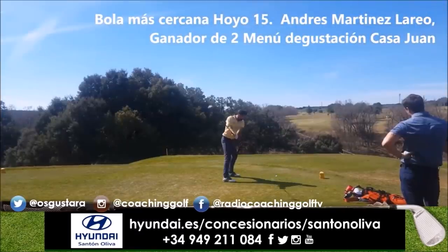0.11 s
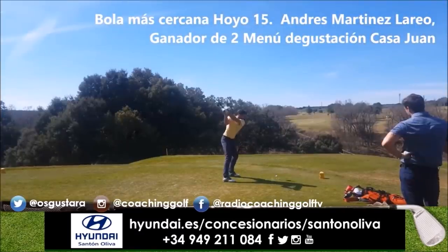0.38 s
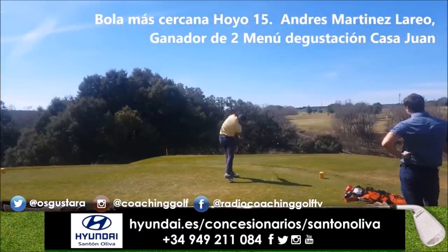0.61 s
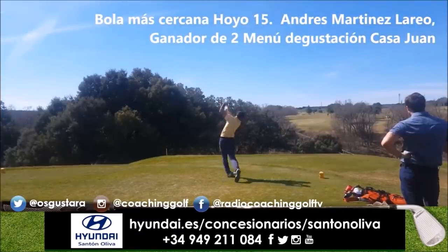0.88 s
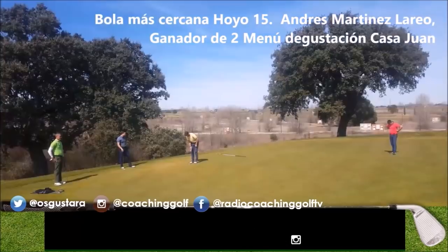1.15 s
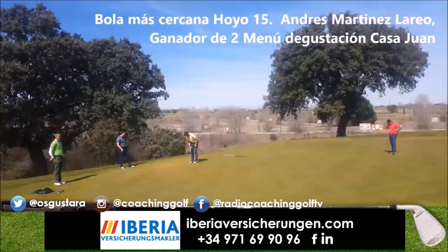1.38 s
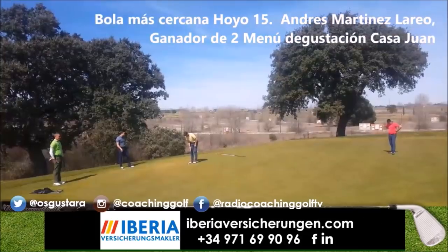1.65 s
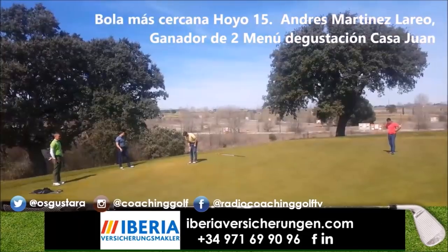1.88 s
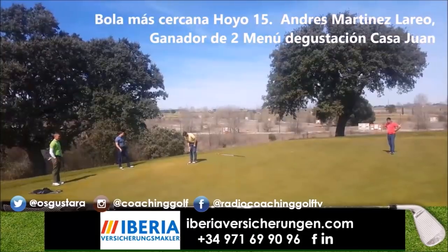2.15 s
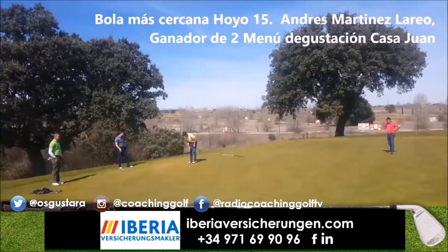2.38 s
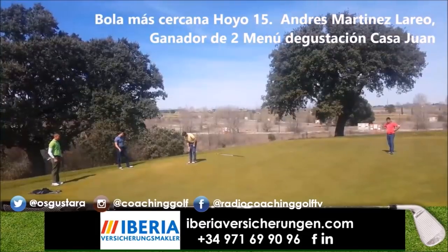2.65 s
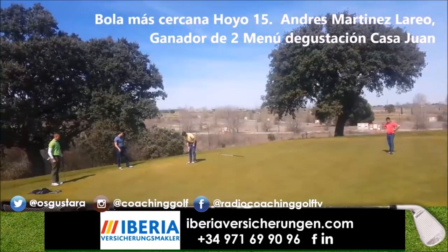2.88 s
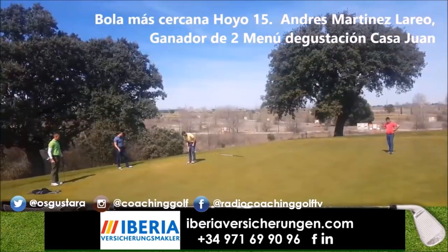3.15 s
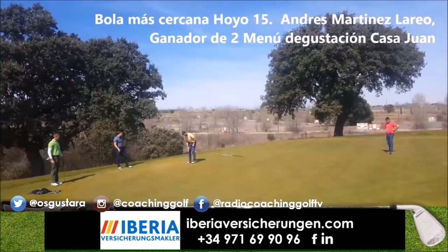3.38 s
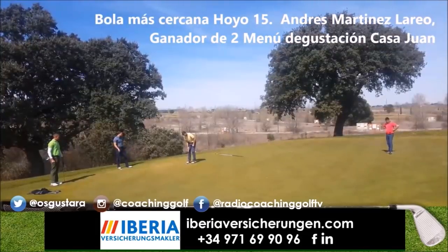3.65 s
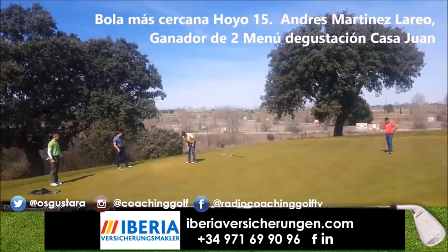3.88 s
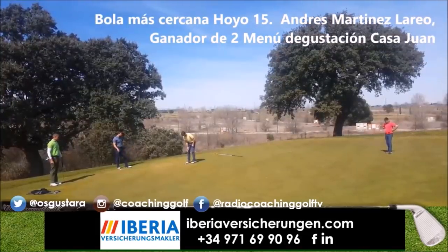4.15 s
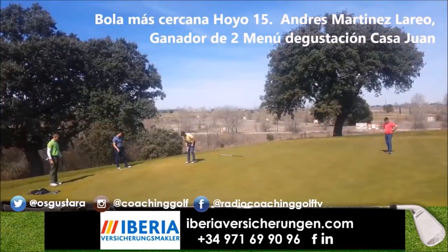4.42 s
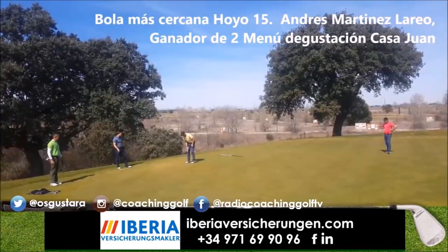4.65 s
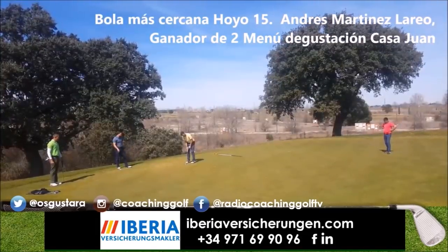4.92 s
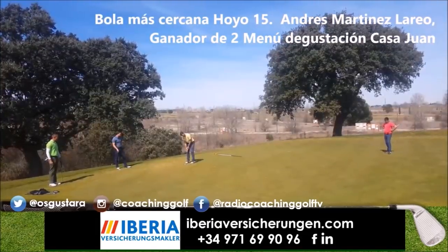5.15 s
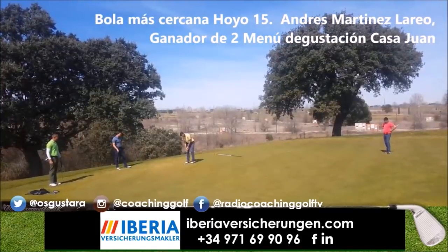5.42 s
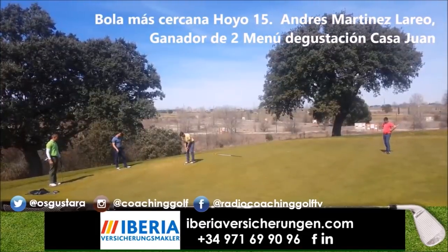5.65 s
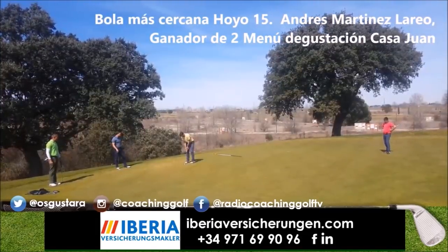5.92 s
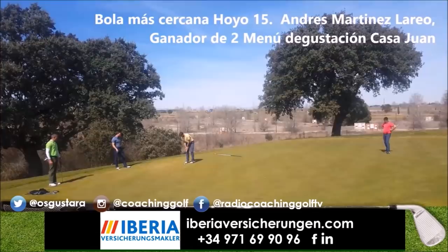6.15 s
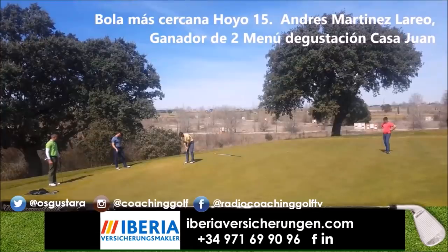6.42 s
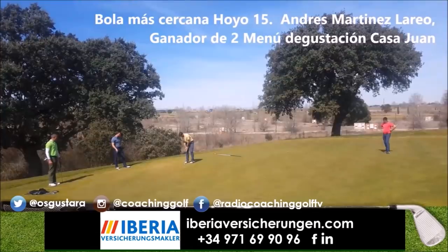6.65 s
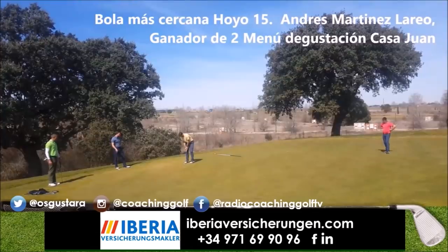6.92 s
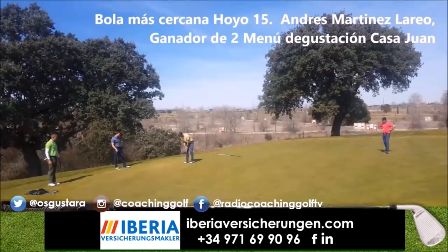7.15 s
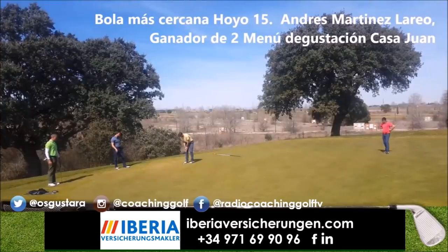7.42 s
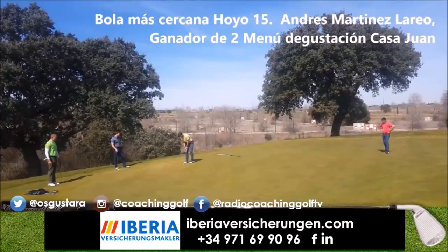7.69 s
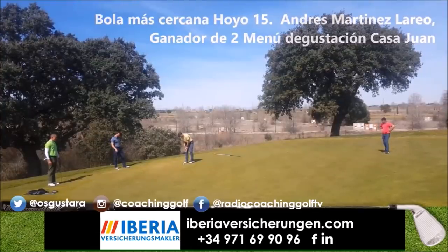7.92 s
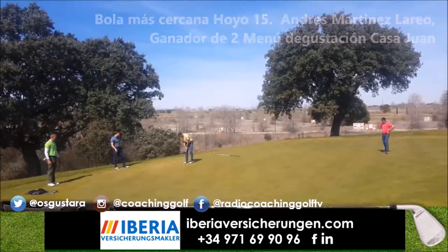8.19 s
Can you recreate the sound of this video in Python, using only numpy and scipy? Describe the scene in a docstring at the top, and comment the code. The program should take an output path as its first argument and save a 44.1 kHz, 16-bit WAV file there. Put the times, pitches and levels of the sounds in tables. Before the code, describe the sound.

Short rising whoosh, a sharp metallic golf strike with scattered outdoor echo, then faint finch and thrush song over soft wind, hiss and distant motor.

```python
"""An iron cracks a ball off a tee: an elastic push and rebound, with a sum of decaying modes for the head.
Before it come a dry tick and the swish of the shaft; after it, turf and trees scatter the crack as noise.
Then a quiet green: a finch, a thrush and two smaller birds, built of gliding sines and noise puffs,
over light wind, hiss and a distant motor, all shaped noise, heard by two spaced microphones."""
import sys
import numpy as np
from scipy import signal
from scipy.io import wavfile
from scipy.ndimage import uniform_filter1d, map_coordinates

SR = 44100
rng = np.random.default_rng(int(sys.argv[2]) if len(sys.argv) > 2 else 0)


def ratio_of_db(decibels):
    """Turn decibels (scalar or array-like) into linear amplitude factors; 0 dB maps to 1."""
    return 10 ** (np.asarray(decibels, float) / 20)


def master_out(mix):
    """Clip the mix to full scale and print it as 16-bit PCM to the path in sys.argv[1]."""
    frames = np.transpose(np.atleast_2d(mix))
    ceiling = np.clip(frames, -1, 1)
    pcm = np.round(ceiling * 32767).astype(np.int16)
    wavfile.write(sys.argv[1], SR, pcm)


N = 366030
T = np.arange(N) / SR
STRIKE_S, GREEN_S = .6674, 1.02  # impact; the scene moves from the tee to the green


def evened(x):
    """Normalisation to unit rms."""
    return x / np.sqrt(np.mean(x ** 2) + 1e-20)


def curve(rows, column=1, t=T):
    """Linear interpolation of a table column over its first column."""
    return np.interp(t, *np.transpose(rows)[[0, column]])


def read(points, hz):
    """Interpolation of a spectrum along a logarithmic frequency axis."""
    f, value = np.transpose(points)
    return np.interp(np.log(hz + 1), np.log(f + 1), value)


def add(mix, s, sound):
    """Superposition: the sound is summed into the mix from s seconds on."""
    part = mix[..., round(s * SR):][..., :sound.shape[-1]]
    part += sound[..., :part.shape[-1]]


def delayed(x, ms):
    """Propagation delay by a fractional, possibly varying, number of samples."""
    return map_coordinates(x, [np.arange(N) - ms * SR / 1000], order=3)


def resonate(x, hz, width):
    """Heterodyne resonance of gain 1: hz is shifted down to zero, smoothed and shifted back."""
    turn = np.exp(2j * np.pi * np.cumsum(hz * np.ones(x.shape[-1])) / SR)
    r = np.exp(-np.pi * width / SR)
    return 2 * (turn * signal.lfilter([1 - r], [1, -r], x / turn)).real


def noise(colour, same, count=N, size=1024, patchy_db=0):
    """Partly coherent stereo noise: spectral shaping, likeness `same` of hz, and drifting patches."""
    hz = np.fft.rfftfreq(size, 1 / SR)
    a, b, c, d, patches = rng.standard_normal((count * 4 // size + 5, len(hz), 5)).T
    patches = uniform_filter1d(patches, 10, 0)
    patches = evened(uniform_filter1d(patches, 10, 1))
    same = np.clip(same(hz) + 0 * hz, -1, 1)[:, None]
    left = a + 1j * b
    right = same * left + np.sqrt(1 - same ** 2) * (c + 1j * d)
    z = np.array([left, right])
    z *= ratio_of_db(read(colour, hz)[:, None] + patchy_db * patches)
    return evened(signal.istft(z, nperseg=size, noverlap=size * 3 // 4)[1][:, :count])


def puff(length, hz, width, db):
    """Band-limited noise burst: two resonances in series under a tapered envelope."""
    z = resonate(rng.standard_normal(SR // 3), hz, width)
    z = resonate(z, hz, width)[-round(length * SR):]
    return ratio_of_db(db) * evened(z) * signal.windows.tukey(len(z), .7)


def note(start, length, from_hz, to_hz, db, shape, rough, wobble=0, beak=None):
    """Frequency modulation: a near sine glides along its shape, soft-ended and wavering in level."""
    t = np.arange(-.004, length + 0.0063, 1 / SR)
    hz = from_hz + (to_hz - from_hz) * curve(shape, 1, t / length)
    db = db + (read(beak, hz) if beak else 0)
    drift = 1 + wobble * evened(uniform_filter1d(rng.standard_normal(SR // 3), 300))[:len(t)]
    turns = np.cumsum(uniform_filter1d(hz * drift, 100)) / SR
    waver = 1 + rough * evened(uniform_filter1d(rng.standard_normal(SR // 3), 350))[:len(t)]
    ends = np.clip(np.minimum(t - t[0], t[-1] - t) / 0.0084, 0, 1)
    level = np.sqrt(2) * ratio_of_db(db + curve(shape, 2, t / length))
    return start + t[0], level * ends * waver * np.sin(2 * np.pi * turns)


def outdoors(x, wet_db, t60):
    """Diffuse scattering: foliage smears each note into a short unlike tail per side."""
    t = np.arange(SR // 2) / SR
    tail = rng.standard_normal((2, len(t))) * ratio_of_db(-60 * t / t60) * (t > .01)
    return ratio_of_db(wet_db) * signal.fftconvolve(x[None], tail / np.linalg.norm(tail[0]), axes=1)[:, :N]


def on_the_right(x):
    """Time and level difference between the sides: the right is earlier and louder, plus foliage."""
    left = delayed(x, .185)
    return np.array([left * ratio_of_db(-3.5), x * ratio_of_db(3.5)]) + outdoors(x, wet_db=-15, t60=.6)


# spectrum of air and hiss: (frequency [Hz], relative density [dB])
AIR_COLOUR = [(120, -38.5), (260, -1.5), (400, -1), (800, -2), (1300, -7.5), (2800, -11), (5000, -13.5),
              (6500, -18), (10000, -21.5), (13000, -18.5), (15800, -18.5)]
# its level: (time [s], level [dB])
AIR_LEVEL = [(0, -72.5), (.6, -69), (1.01, -73.5), (1.03, -71), (3, -71.5), (8.3, -71.5)]
# left-right likeness: (frequency [Hz], coherence [-1 to 1])
AIR_LIKENESS = [(60, 0.61), (240, 0.1), (950, -0.06), (3770, -0.12), (15000, -0.01)]


def air():
    """Broadband noise of air and microphone hiss, with frequency-dependent coherence."""
    hiss = noise(AIR_COLOUR, lambda hz: read(AIR_LIKENESS, hz), size=2048, patchy_db=0.84)
    return hiss * ratio_of_db(curve(AIR_LEVEL))


# low rumble of wind and far traffic: (time [s], level [dB])
WIND_LEVEL = [(0, -69.5), (.6, -70), (.75, -75), (1.01, -79.5), (1.03, -69), (1.6, -68), (2.2, -64.5),
              (2.6, -67), (4, -68), (5.4, -67.5), (6.2, -68.5), (6.7, -65), (7.6, -66), (8.3, -66)]
# its spectrum: (frequency [Hz], relative density [dB])
WIND_COLOUR = [(15, -23.5), (40, -2.5), (95, -0.5), (160, -9), (250, -14), (500, -52), (1500, -110)]
# wind buffets on the microphones:
# (start [s], length [s], frequency [Hz], width [Hz], level before tapering and panning [dB])
BUFFETS = [(0.528, .045, 30, 30, -63), (0.667, 0.037, 45.3, 30, -52.5), (1.888, 0.043, 69, 27, -60),
           (2.076, 0.0388, 59.5, 43, -54), (2.183, 0.081, 55, 22, -55.5)]


def wind():
    """Low-frequency turbulence: a rumble of wind and far traffic, and buffets louder on the left."""
    rumble = noise(WIND_COLOUR, lambda hz: .55, size=4096, patchy_db=2.7) * ratio_of_db(curve(WIND_LEVEL))
    for s, *buffet in BUFFETS:
        add(rumble, s, puff(*buffet) * ratio_of_db(np.array([[2.5], [-2.5]])))
    return rumble


# note shapes: (share of the length [0 to 1], share of the glide [1 = whole], relative level [dB])
SLIDE = [(0, 0, -4.5), (.4, .5, 0), (1, 0.95, -2)]  # an even glide, up or down
HOOK = [(0, 0, -7), (.3, .22, -5), (.82, .56, 0), (1, 1, -2)]  # a fall that steepens and swells
ARCH = [(0, 0, 0), (.15, .9, -4), (.3, 1, -6), (.8, .62, -1), (1, -.1, 1)]  # flicked up, then hooked down
# the finch, one table for each shape:
# (start [s], length [s], from [Hz], to [Hz], level before shape and beak [dB])
FINCH_SLIDES = [(.02, 0.033, 6240, 5500, -79), (.155, 0.051, 6500, 5670, -81),
                (.22, 0.024, 5750, 5100, -87), (1.28, .095, 6450, 5280, -73),
                (1.49, 0.072, 5950, 5120, -70), (4.03, .1, 6800, 5365, -71), (6.738, .01, 4930, 6040, -74),
                (6.93, 0.035, 4520, 4480, -79), (7.33, .12, 4550, 4550, -84),
                (3.458, .012, 5600, 5140, -76), (3.688, .012, 5690, 5430, -74),
                (3.716, .011, 5686, 5200, -71), (3.825, 0.017, 5330, 5860, -73.5),
                (3.855, .013, 5600, 5300, -77.5), (3.64, 0.085, 7280, 6650, -74),
                (4.225, .09, 6290, 5220, -74), (4.41, 0.1, 6410, 5050, -72),
                (4.675, 0.1, 6264, 5230, -79.5), (4.685, .08, 7230, 6650, -78.5),
                (4.895, 0.064, 6330, 5620, -80), (5.97, 0.096, 7560, 6580, -75),
                (6.29, 0.18, 4650, 4540, -88), (6.795, 0.057, 4600, 4500, -77),
                (7.065, .035, 6120, 5790, -79.5), (7.07, .055, 7100, 6970, -82),
                (7.115, .015, 5760, 5250, -73), (7.29, 0.057, 7490, 6990, -78.5),
                (7.315, 0.043, 5700, 5450, -70), (7.51, 0.083, 7620, 7100, -75.5),
                (7.58, 0.027, 5670, 5420, -70)]
FINCH_HOOKS = [(1.05, 0.15, 7180, 5170, -71), (1.465, .022, 6500, 4920, -65.5),
               (1.61, 0.032, 5674, 4650, -73.5), (1.685, 0.041, 5370, 4810, -75.5),
               (1.77, 0.033, 5570, 4700, -76), (1.855, 0.038, 5470, 4790, -75),
               (1.96, 0.029, 5300, 4526, -76), (3.13, 0.023, 5370, 4650, -75.5),
               (3.24, 0.017, 5300, 4700, -74), (3.345, .02, 5400, 4700, -77), (3.83, .112, 7280, 5955, -71),
               (4.605, 0.048, 6260, 4840, -70), (6.17, .14, 7150, 5430, -71),
               (6.385, 0.096, 6000, 5150, -64.5), (6.575, 0.079, 6350, 4765, -60.5),
               (6.752, .039, 6230, 4600, -60.5), (6.85, 0.067, 5700, 4680, -67.5),
               (7.225, 0.053, 6804, 4640, -68.5), (7.725, 0.061, 6900, 4560, -70)]
FINCH_ARCHES = [(4.853, 0.03, 5180, 6370, -69), (6.998, 0.055, 4800, 6700, -69),
                (7.455, .032, 4870, 6340, -72)]
# the finch's radiation by pitch: (frequency [Hz], gain [dB])
BEAK = [(4400, -4.5), (5400, 0.5), (6000, -7), (7500, -2)]
# its rasping syllables: (start [s], length [s], level before tapering [dB])
FINCH_RASPS = [(4.641, 0.12, -76.5), (4.87, .11, -76.5), (6.78, .13, -78), (7.037, .1, -76),
               (7.254, .11, -75.5), (7.47, .13, -76), (7.769, .073, -75)]
RASP_HZ, RASP_WIDTH_HZ = 6500, 2800


def finch():
    """Gliding tones weighted by the beak's radiation response, and rasps of band-limited noise."""
    song = np.zeros(N)
    for rows, shape in [(FINCH_SLIDES, SLIDE), (FINCH_HOOKS, HOOK), (FINCH_ARCHES, ARCH)]:
        for row in rows:
            add(song, *note(*row, shape, rough=0.33, wobble=0.0045, beak=BEAK))
    for s, length, db in FINCH_RASPS:
        add(song, s, puff(length, RASP_HZ, RASP_WIDTH_HZ, db))
    return song


# a soft swell: (share of the length [0 to 1], share of the glide [0 to 1], relative level [dB])
FLUTE = [(0, 0, -6), (.5, .55, 0), (1, 1, -5)]
# whistled notes: (start [s], length [s], from [Hz], to [Hz], level before shape [dB])
THRUSH_NOTES = [(0.027, 0.16, 2726, 2700, -86), (1.209, 0.067, 2110, 2340, -79),
                (1.278, .16, 2310, 2190, -79.5), (1.519, 0.051, 2860, 2460, -76),
                (1.791, 0.078, 2040, 2220, -72.5), (1.85, 0.064, 2250, 2090, -72),
                (1.93, 0.099, 2180, 2217, -76), (2.075, 0.22, 2462, 2735, -68),
                (2.271, 0.071, 2690, 3007, -70), (2.788, 0.12, 1967, 2045, -74.5),
                (2.949, .12, 1853, 1950, -80.5), (3.103, .12, 3076, 3190, -79.5),
                (3.118, 0.093, 2590, 2490, -70), (3.21, 0.14, 2277, 2206, -72.5),
                (4.26, 0.046, 2166, 2184, -80), (4.45, 0.091, 2556, 2458, -64.5),
                (4.527, 0.097, 2450, 2160, -65), (4.83, 0.11, 1932, 1857, -76.5),
                (5.332, 0.11, 2410, 2675, -70), (5.591, .1, 1866, 2046, -75),
                (5.694, 0.076, 2050, 2466, -69.5), (5.758, 0.085, 2464, 2520, -66),
                (5.9, .06, 2470, 2470, -79), (8.232, 0.074, 2310, 2485, -74)]
# rasps: (start [s], length [s], frequency [Hz], width [Hz], level before tapering [dB])
THRUSH_RASPS = [(3.247, .11, 2290, 400, -77), (4.96, .15, 2203, 500, -74)]
# it changes perch: (time [s], lag of the left side [ms])
THRUSH_LAG = [(3.9, 0.044), (4.2, 0.14)]


def thrush():
    """Fluted gliding tones and noise rasps, placed by a delay between sides and diffused by foliage."""
    song = np.zeros(N)
    for row in THRUSH_NOTES:
        add(song, *note(*row, FLUTE, rough=0.41, wobble=.005))
    for s, *rasp in THRUSH_RASPS:
        add(song, s, puff(*rasp))
    left = delayed(song, curve(THRUSH_LAG))
    return np.array([left, song]) + outdoors(song, wet_db=-9, t60=.45)


# a dry tick at the top of the backswing: (time [s], gain on the decaying noise [dB])
TICKS = [(0.387, -48)]


def tick():
    """Transient excitation: a few milliseconds of bright, exponentially decaying noise."""
    out = np.zeros((2, N))
    t = np.arange(SR // 50) / SR
    colour = [(800, -24.0), (2000, 1.5), (4000, -3), (8000, -13.5), (15000, -9.5)]  # (Hz, relative dB)
    for s, db in TICKS:
        snap = noise(colour, lambda hz: .8, count=len(t), size=256)
        add(out, s, ratio_of_db(db) * snap * ratio_of_db(-8 - 60 * t / 0.029))
    return out


# the moving shaft: (time [s], gain on rush and whistle [dB], whistle [Hz])
SWISH = [(.59, -61, 551), (.602, -56, 603), (.615, -49.5, 720.9), (.632, -44, 877.8), (.65, -45.5, 1050),
         (.661, -55.5, 1122), (.667, -49.5, 1145)]
# spectrum of the rush: (frequency [Hz], relative density [dB])
SWISH_COLOUR = [(60, -30.5), (140, -0.5), (300, -13.5), (900, -7.5), (1500, -14), (3500, -20),
                (5400, -30.5), (15000, -46.5)]


def swish():
    """Aeolian tone: air torn by the shaft rushes, and a breathy whistle rises with speed."""
    t = np.arange(SWISH[0][0], STRIKE_S, 1 / SR)
    rush = noise(SWISH_COLOUR, lambda hz: 1 - hz / 9000, count=len(t), size=256)
    whistle = evened(resonate(rng.standard_normal(len(t)), curve(SWISH, 2, t), 150))
    return ratio_of_db(curve(SWISH, 1, t)) * (.8 * rush + .6 * whistle)


STRIKE_DB, CONTACT_MS = -5.5, .31  # peak before the high-pass; time scale of the contact
BALL_LAG_MS, SNAP = .06, 5.  # the crack reaches the left later; how abruptly push turns to rebound
# reflections off the turf: (delay [ms], left gain [dB], right gain [dB])
BOUNCES = [(1.82, -12, -5), (3.6, -22, -17.5)]
# modes of the club head: (frequency [Hz], level before waver and panning [dB], T60 [s],
# time until the turning face aims the mode at the listener [ms], left-right difference [dB])
CLUB = [(610, -25, .025, .5, 1.5), (1760, -50, 0.049, 55, 0), (2162, -37, .06, 13, -2),
        (3370, -41, 0.054, 27, -3.5), (3307, -35, .03, 37, -3), (3550, -53, .025, 77, 0),
        (3960, -27.5, 0.099, 7, -2.5), (4033, -23, .065, 16, -3.5), (4140, -30.5, .07, 2.3, -3),
        (4700, -29, 0.025, .5, 0.5), (5600, -29.5, .04, .5, 1), (6160, -24.5, 0.026, .3, -7.5),
        (7470, -16, 0.02, 0.9, 12.5), (8400, -23.5, 0.018, .3, 9), (9020, -20.5, 0.022, 0.25, 8),
        (10726, -27.5, 0.014, .3, 5), (12460, -27.5, 0.012, .3, 5), (14500, -33.5, .018, .3, 4)]


def strike():
    """Elastic impact and modal decay: the ball is squeezed flat and springs back, and the head rings."""
    t = np.arange(SR // 4) / SR
    u = ((t - .00066) * 1000 - np.array([[BALL_LAG_MS], [0]])) / CONTACT_MS
    ball = -np.tanh(SNAP * u) * np.exp(-1.2 * abs(u - .1) ** 3)
    ball = ratio_of_db(STRIKE_DB) * ball / ball.max()
    out = ball.copy()
    for ms, left_db, right_db in BOUNCES:
        add(out, ms / 1000, ball * ratio_of_db(np.array([[left_db], [right_db]])))
    out = signal.lfilter(*signal.butter(2, 340, "high", fs=SR), out)  # a small ball radiates no bass
    late = np.maximum(t - .0006, 0)
    for hz, db, t60, aim_ms, pan_db in CLUB:
        swell = np.minimum(late * 1000 / aim_ms, 1) ** 1.145
        # a random waver roughens the ring of each mode
        waver = 1 + 0.38 * evened(uniform_filter1d(rng.standard_normal(len(t)), 120))
        decay = ratio_of_db(db - 60 * np.maximum(late - aim_ms / 1000, 0) / t60)
        phase = np.array([[0], [2.4 * (7300 < hz < 9500)]])  # these modes beam in lobes of opposite sign
        phase = phase + np.pi * (hz < 1000)  # the lowest mode swings with the rebound
        sides = ratio_of_db(np.array([[pan_db / 2], [-pan_db / 2]]))
        out += waver * swell * decay * np.sin(2 * np.pi * hz * late - phase) * sides
    return out


# spectra of the scattered sound: (frequency [Hz], relative density [dB])
TURF_COLOUR = [(200, -20), (600, -8), (1400, -6), (2200, 2), (3000, -6.5), (6000, 0), (9000, -7.5),
               (15800, -14.5)]
TREE_COLOUR = [(200, -25), (600, -2), (1600, 0), (3500, -10), (5600, -3), (7000, -8.5), (15800, -22.5)]
TURF_DB, TURF_T60_S = -25, 0.082  # scatter off the ground dies at once
SLAP_S, SLAP_DB, SLAP_T60_S = 0.047, -50.5, 0.21  # one near reflector throws it back
TREES_S, TREES_RISE_S, TREES_HOLD_S = .088, 0.021, .045  # the tree line answers
TREES_DB, TREES_T60_S = -53.5, 0.58


def scatter(hit):
    """Diffuse reflection: countless weak echoes of the crack and main ring, duller from farther off."""
    t = np.arange(SR // 2) / SR
    turf = noise(TURF_COLOUR, lambda hz: .4, count=len(t), size=256)
    trees = noise(TREE_COLOUR, lambda hz: .1, count=len(t), size=256, patchy_db=3.0)
    dull = signal.lfilter(*signal.butter(2, 5000, fs=SR), trees)
    far = np.clip((t - .15) / .08, 0, 1)
    ground = ratio_of_db(TURF_DB - 60 * t / TURF_T60_S) * (t > .001)
    slap = ratio_of_db(SLAP_DB - 60 * (t - SLAP_S) / SLAP_T60_S) * np.clip((t - SLAP_S) / .004 + 1, 0, 1)
    near = np.hypot(ground, slap)
    late = t - TREES_S
    fall_s = np.maximum(late - TREES_RISE_S - TREES_HOLD_S, 0)
    level = np.clip(late / TREES_RISE_S, 0, 1) * ratio_of_db(TREES_DB - 60 * fall_s / TREES_T60_S)
    level = level * (t < GREEN_S - STRIKE_S)  # the tree echo ends with the tee scene
    taps = rng.standard_normal((2, len(t))) * level * (1 - far) / np.sqrt(SR)
    main_ring = resonate(hit.mean(0), 4240, 300)[None]
    ring = ratio_of_db(33.5) * signal.fftconvolve(main_ring, taps, axes=1)[:, :len(t)]
    return ring + near * turf + level * ((1 - far) * trees + far * dull)


# the blade bites the turf:
# (start [s], length [s], frequency [Hz], width [Hz], level before tapering [dB])
THUDS = [(.687, .03, 180.1, 69.97, -53)]


def thud():
    """Damped low resonance: a short noise burst as the blade bites the turf."""
    out = np.zeros(N)
    for s, *burst in THUDS:
        add(out, s, puff(*burst))
    return out


# engine lines: (multiple of the firing rate, level [dB], width [Hz])
MOTOR_LINES = [(1, -81, 8), (2, -80, 3.6), (4, -92, 8), (8, -87.5, 8.4)]
# firing rate: (time [s], rate [Hz])
MOTOR_SPEED = [(1.02, 104.2), (3.5, 106.7), (6, 103.5), (8.3, 104.6)]


def motor():
    """Harmonic series: a far engine as a few wavering multiples of its firing rate."""
    out = np.zeros(N)
    for multiple, db, width in MOTOR_LINES:
        line = resonate(rng.standard_normal(N), multiple * curve(MOTOR_SPEED), width)
        out += ratio_of_db(db) * evened(line)
    return out * (T > MOTOR_SPEED[0][0])


# phrases of the chipping bird: (time [s], gain on the phrase [dB])
CHIPS = [(1.021, -69), (1.135, -66.5), (1.25, -67.5), (1.37, -69), (8.093, -74), (8.205, -73.5)]
# one phrase, a flat note and a flick:
# (start [s], length [s], from [Hz], to [Hz], level within the phrase [dB])
CHIP_NOTES = [(0, 0.018, 4480, 4373, 0), (0.014, 0.02, 5470, 4430, -3)]
# then a buzz: (start [s], length [s], frequency [Hz], width [Hz], level within the phrase [dB])
CHIP_BUZZ = (.047, .035, 3650, 1100, -3)


def chipper():
    """Rapid frequency glides closed by a band-limited noise buzz."""
    song = np.zeros(N)
    for s, db in CHIPS:
        for row in CHIP_NOTES:
            start, sound = note(*row, SLIDE, rough=0.19)
            add(song, s + start, ratio_of_db(db) * sound)
        add(song, s + CHIP_BUZZ[0], ratio_of_db(db) * puff(*CHIP_BUZZ[1:]))
    return song


# a fourth bird, far off: (start [s], length [s], from [Hz], to [Hz], level before shape [dB])
FAR_NOTES = [(6.439, 0.068, 3036, 2830, -82), (6.854, .06, 2900, 2545, -81.5),
             (7.077, 0.048, 3860, 3070, -81), (7.599, 0.05, 3346, 3150, -83)]


def far_bird():
    """Falling frequency glides, faint and equal on both sides."""
    song = np.zeros(N)
    for row in FAR_NOTES:
        add(song, *note(*row, SLIDE, rough=0.37))
    return song


def scene():
    """Linear superposition of all the sources."""
    mix = air() + wind() + motor()
    mix += on_the_right(finch() + chipper()) + thrush() + far_bird()
    mix += tick() + thud()
    add(mix, SWISH[0][0], swish())
    hit = strike()
    add(mix, STRIKE_S, hit)
    add(mix, STRIKE_S, scatter(hit))
    return mix


def band_limit(x):
    """A steep low-pass at the top of the band."""
    return signal.sosfilt(signal.butter(12, 15750, fs=SR, output="sos"), x)


def record(dry):
    """Final stage of the signal chain: the finished stereo mix goes through band_limit()."""
    return band_limit(dry)


dry = scene()
out = record(dry)
master_out(out)
```